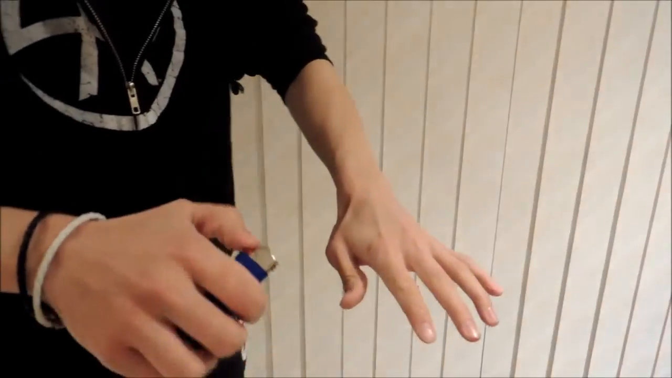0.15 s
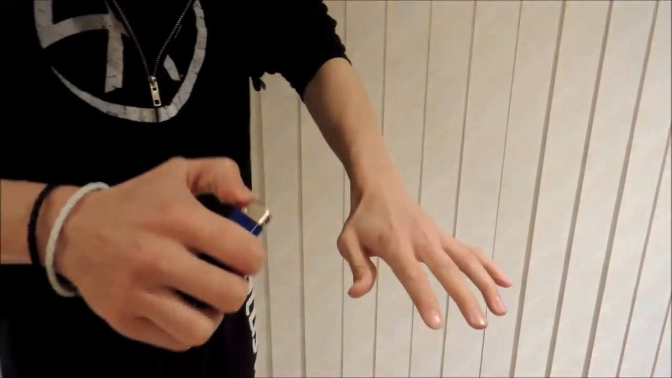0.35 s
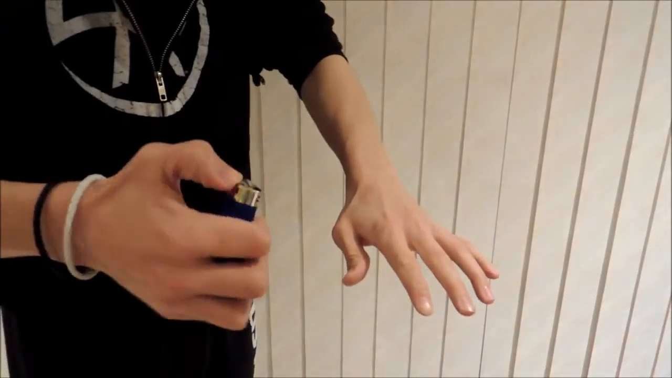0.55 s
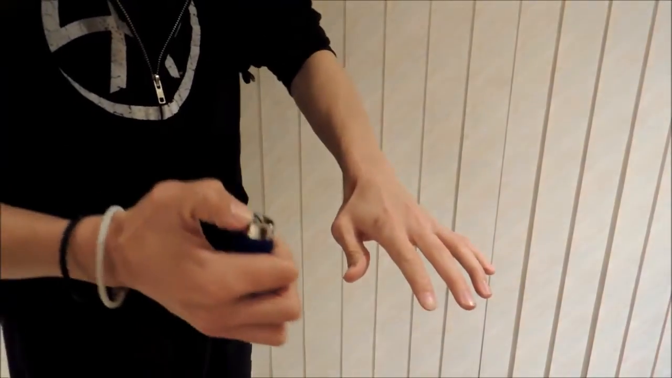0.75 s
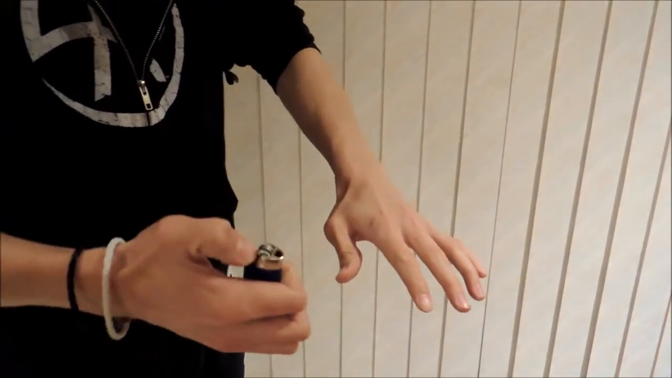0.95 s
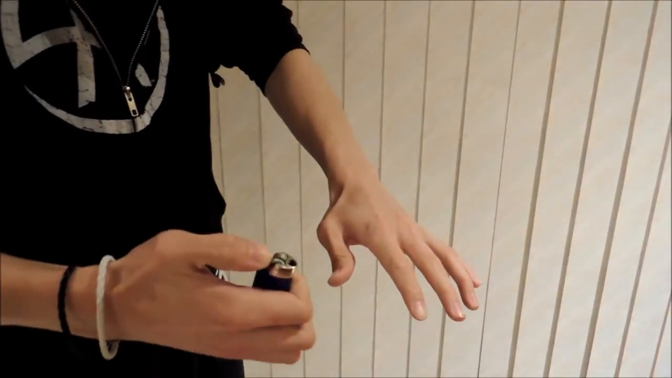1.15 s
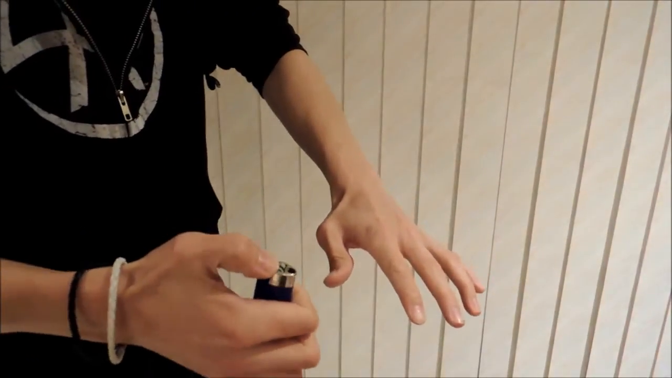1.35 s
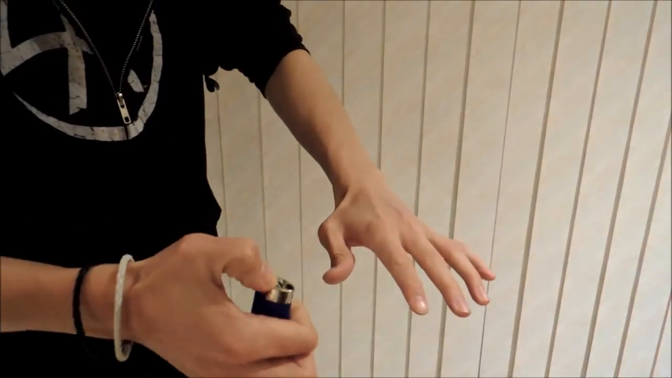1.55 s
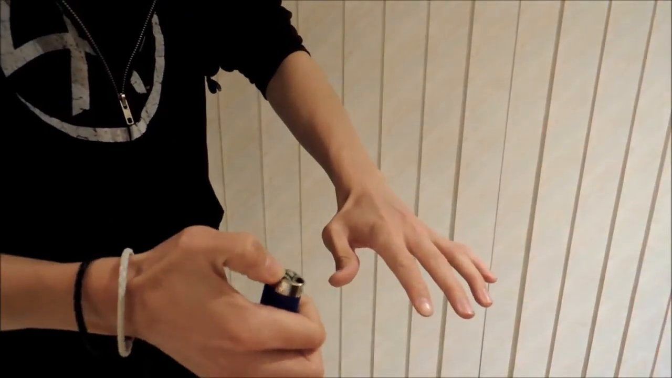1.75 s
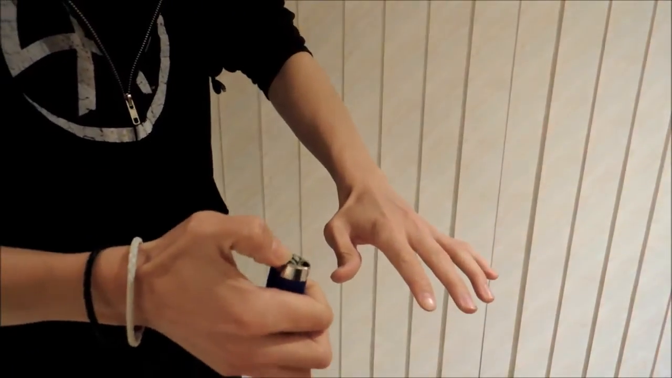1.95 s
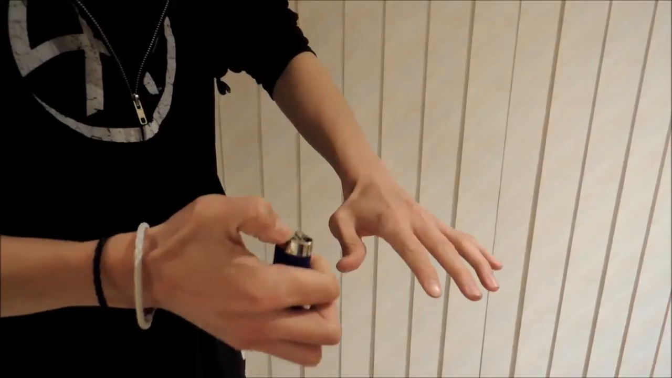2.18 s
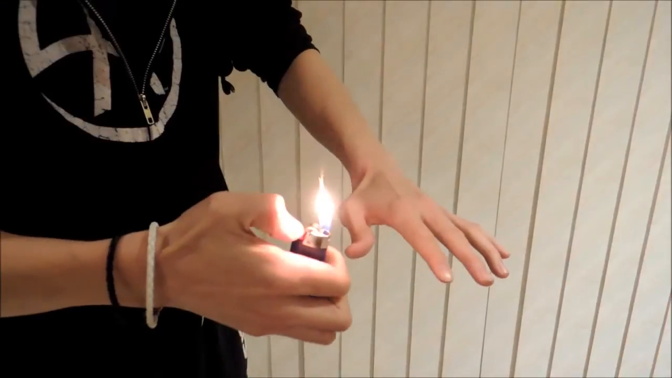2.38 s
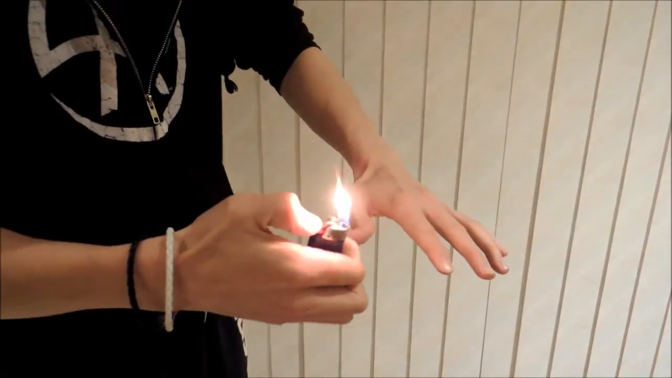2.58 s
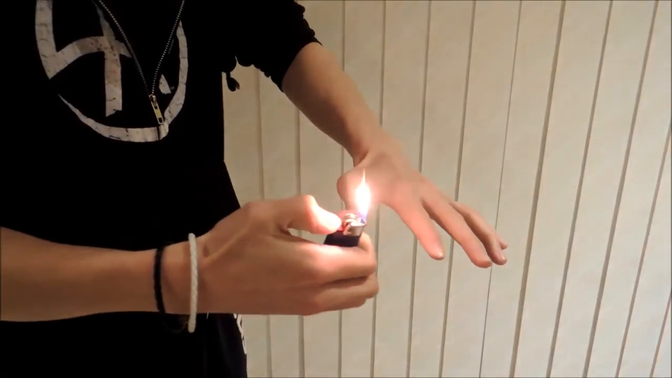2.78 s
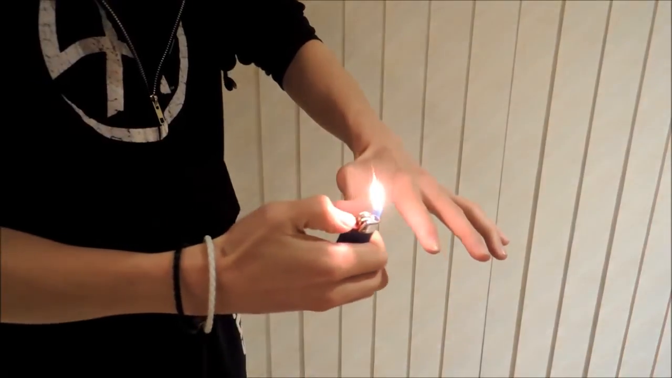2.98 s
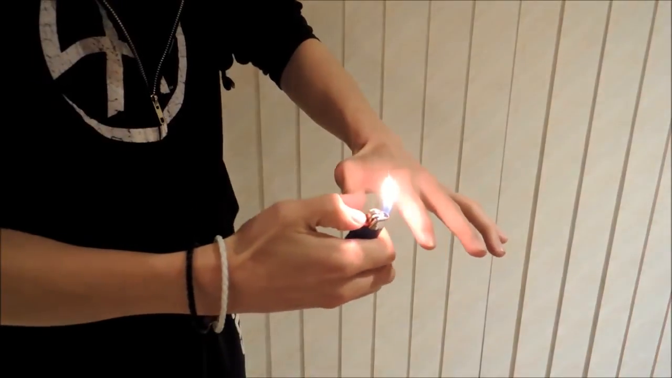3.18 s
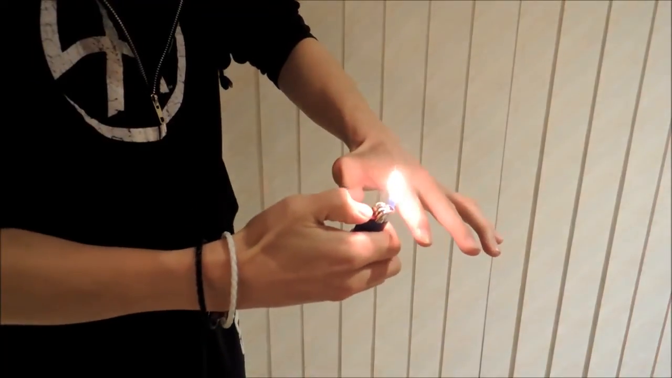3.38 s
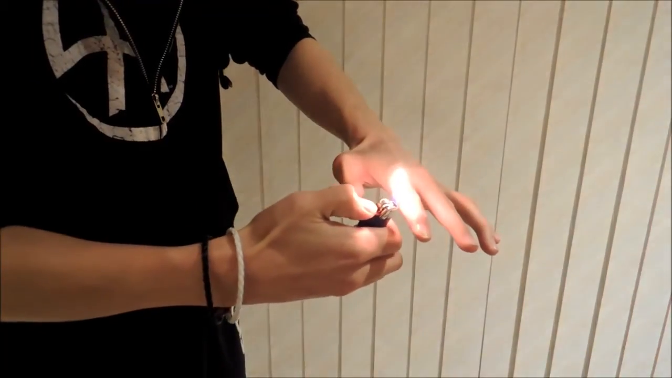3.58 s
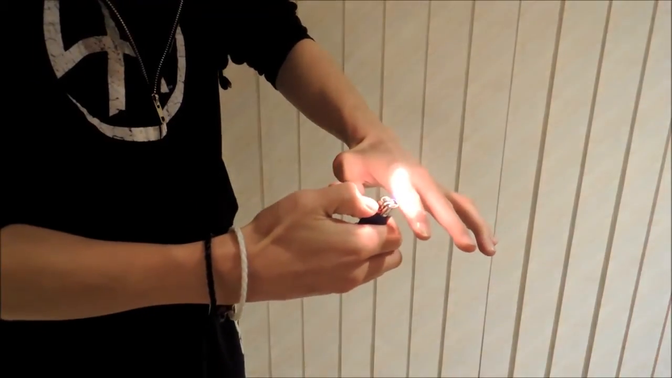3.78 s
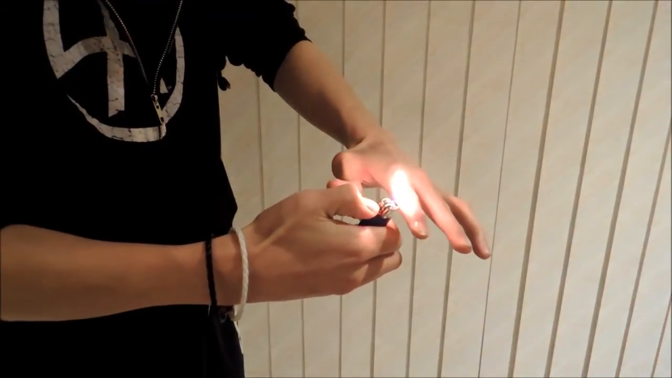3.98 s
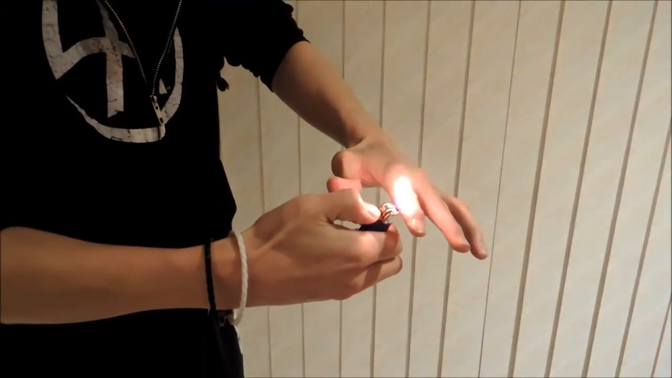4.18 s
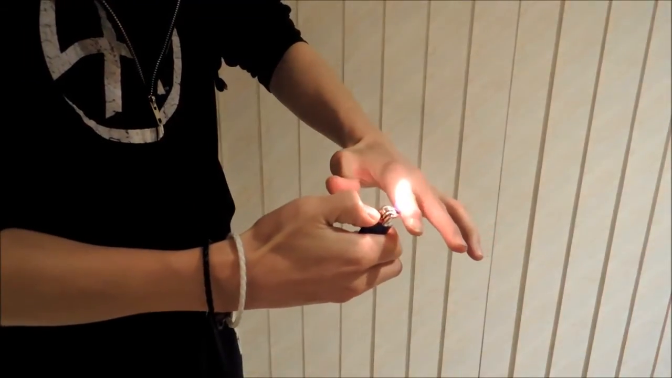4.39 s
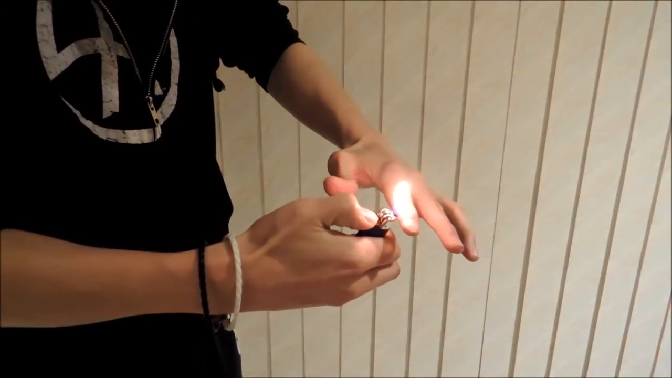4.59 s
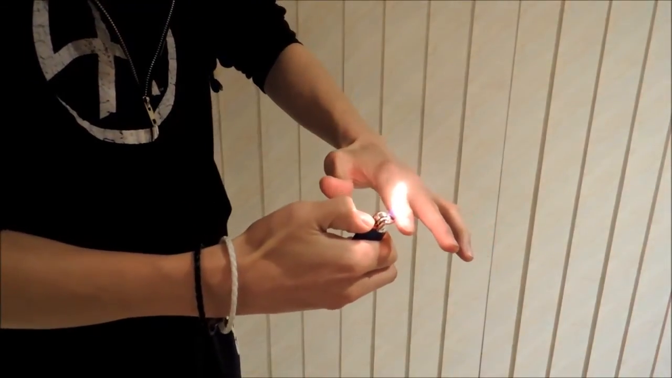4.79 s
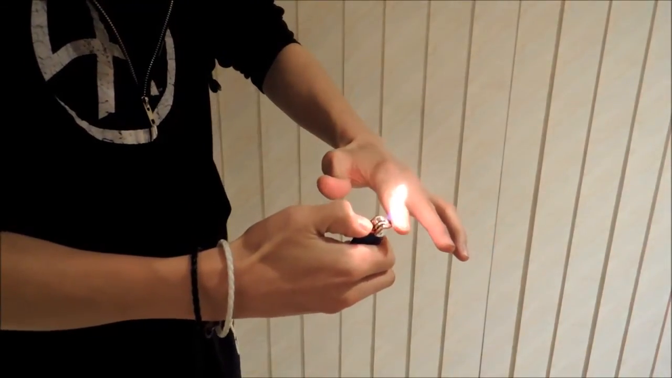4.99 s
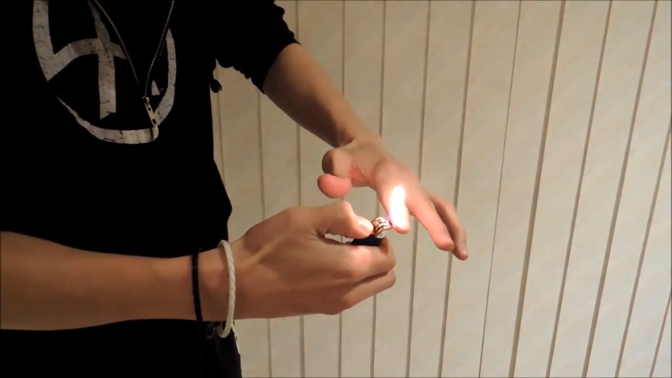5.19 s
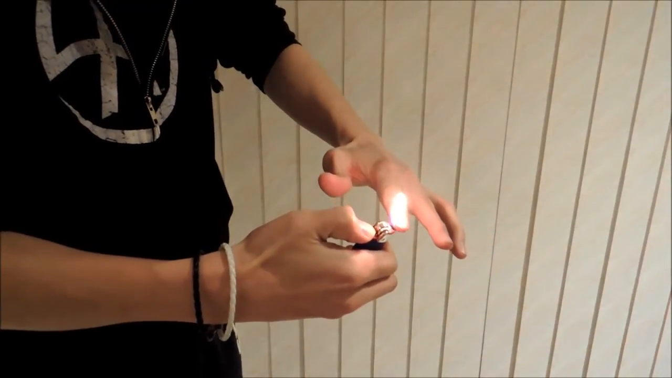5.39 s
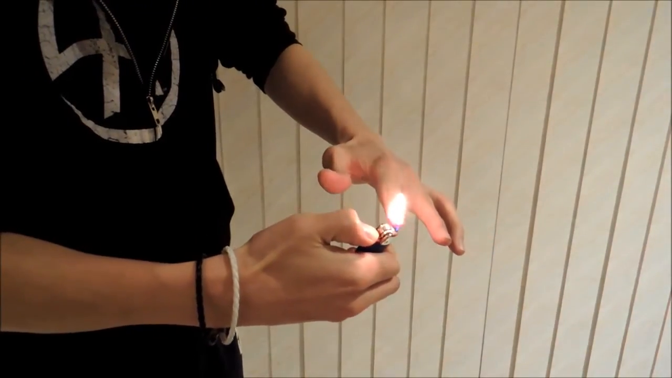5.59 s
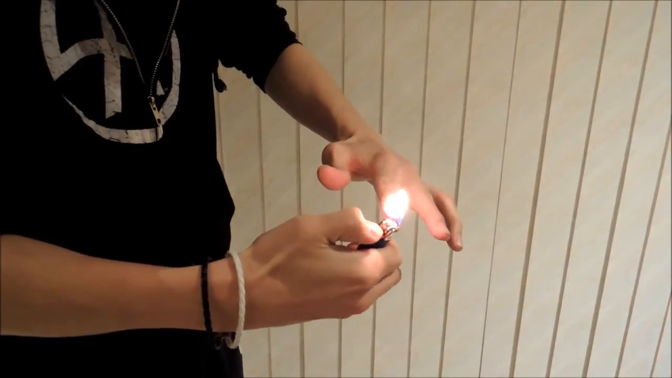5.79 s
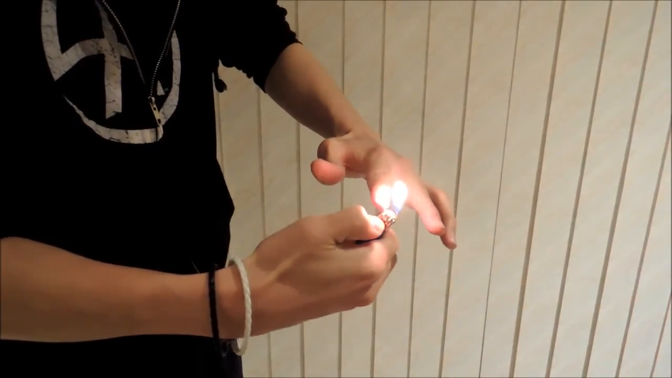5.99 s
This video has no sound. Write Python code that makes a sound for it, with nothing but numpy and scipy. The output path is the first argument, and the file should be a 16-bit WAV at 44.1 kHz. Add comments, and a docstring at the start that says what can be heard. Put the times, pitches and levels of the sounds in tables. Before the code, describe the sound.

A small panelled room, heard in stereo from close by: a low, steady, slightly wavering mains hum lies under soft air noise, with tiny irregular watery plinks farther away throughout. Hands rub faintly around 0.5 s, and the thumb makes small dry ticks at 0.7 and 0.8. At 0.97 s the lighter's toothed wheel gives a loud, very brief, bright rasp with snappy lever taps and a thin metallic ring that dies within half a second. A clear tick comes at 1.24, a softer one at 1.8, another faint one at 2.0. At 2.38 the second strike is harsher, with a high squeal, a dull plastic knock and another bright tap. Small ticks follow near 2.55. From 3 s on it is quiet: hum, scattered plinks, a more noticeable one near 3.4, slight thumb slides at 3.1, 4.5 and 5.4, and a short soft rub at 5.1, until about 6 s.

```python
"""A disposable lighter is struck twice close to the microphone in a small panelled room.
The toothed wheel rasps over the flint, squeals and sets the metal hood ringing; the lever taps and knocks.
The thumb ticks and scrapes on the case, and the hands rub softly: all are shaped bursts of noise.
A mains appliance hums as a row of harmonics over room air, which is coloured noise; gliding sine bubbles
make faint plinks, like water trickling in a radiator, from across the room."""
import sys
import numpy as np
from scipy import signal
from scipy.fft import rfft, irfft
from scipy.io import wavfile

SR = 44100
rng = np.random.default_rng(int(sys.argv[2]) if len(sys.argv) > 2 else 0)


def pcm_store(signal):
    """Save signal as 16-bit PCM."""
    levels = np.round(np.clip(np.atleast_2d(signal), -1, 1) * 32767)
    wavfile.write(sys.argv[1], SR, levels.astype(np.int16).T)


N = 266760
TIME = np.arange(N) / SR
OPPOSITE = np.array([[1], [-1]])  # left and right with opposite signs


def from_db(db):
    """Level law: decibels to amplitude gain."""
    return 10 ** (np.asarray(db) / 20)


def rms_one(x):
    """Normalisation: scale to an rms of 1."""
    return x / np.sqrt(np.mean(x ** 2) + 1e-20)


def at_hz(points, hz):
    """Interpolation of a table along a logarithmic frequency axis."""
    f, value = np.transpose(points)
    return np.interp(np.log(np.maximum(hz, 1)), np.log(f), value)


def bins(x):
    """Frequencies (Hz) of the Fourier bins of x."""
    return np.fft.rfftfreq(x.shape[-1], 1 / SR)


def colour(x, spectrum):
    """Linear filtering: weight each frequency by a smooth gain curve in dB."""
    gain = from_db(at_hz(spectrum, bins(x)))
    return irfft(rfft(x) * gain, x.shape[-1])


def drift(knots_per_s):
    """Random modulation: straight lines between normally distributed knots."""
    knots = rng.standard_normal(4096)
    return np.interp(TIME * knots_per_s, np.arange(len(knots)), knots)


def resonate(x, hz, width_hz):
    """Resonance: a damped two-pole mode with gain 1 at its peak."""
    radius = np.exp(-np.pi * width_hz / SR)
    zeros = np.array([1, 0, -1]) * (1 - radius ** 2) / 2
    poles = [1, -2 * radius * np.cos(2 * np.pi * hz / SR), radius ** 2]
    return signal.lfilter(zeros, poles, x + 1e-18)


def swell(peak_s, rise_s, fall_s):
    """Exponential growth up to a peak, exponential decay after it."""
    time_constants = np.maximum((peak_s - TIME) / rise_s, (TIME - peak_s) / fall_s)
    return np.exp(-np.minimum(time_constants, 50))


def under(envelope, x):
    """Energy matching: give a burst the rms of its envelope."""
    return rms_one(x) * np.sqrt(np.mean(envelope ** 2))


MAINS_HZ = 59.98
# mains harmonics: order (multiple of the mains rate), level_db (dB rms before the waver)
HARMONICS = [(1, -68.5), (2, -63.5), (3, -60), (4, -62), (5, -51), (6, -62), (7, -55.5), (8, -61.5),
             (9, -65), (10, -66.5), (12, -66), (13, -88), (14, -76.5), (15, -66.5), (16, -67.5)]


def hum(waver_db=1.3, scatter_rad=0.77):
    """Magnetic attraction pulls an iron core twice per mains cycle; odd orders are set a quarter turn off."""
    out = np.zeros((2, N))
    for order, level_db in HARMONICS:
        quarter_turn = np.pi / 2 * (order % 2)
        stereo_turn = .1 * rng.choice([-1, 1]) * OPPOSITE
        phase = quarter_turn + scatter_rad * rng.standard_normal() + stereo_turn
        amplitude = np.sqrt(2) * from_db(level_db + waver_db * drift(5.6))
        out += amplitude * np.sin(2 * np.pi * order * MAINS_HZ * TIME + phase)
    return out


# spectrum of the room air: frequency_hz, relative gain_db
AIR_SPECTRUM = [(12, -38.5), (20, 1), (81, -8.5), (179, -9.5), (249, -12.5), (302, -10.5), (346, -15),
                (419, -9.5), (650, -12.5), (706, -18), (787, -13.5), (954, -10.5), (1160, -19),
                (12900, -26.5), (14000, -26)]
# left-right likeness of the room air: frequency_hz, correlation (0-1)
AIR_LIKENESS = [(30, 1), (100, 0.5), (400, 0.67), (1000, 0.53), (3000, 0.03), (12000, 0)]
AIR_DB = -50  # rms


def air():
    """Partial coherence: low rumble and smooth hiss, more alike on the two sides in the bass."""
    mid, side = rfft(rng.standard_normal((2, N)))
    alike = np.clip(at_hz(AIR_LIKENESS, bins(TIME)), 0, 1)
    pair = irfft(np.sqrt(1 + alike) * mid + np.sqrt(1 - alike) * side * OPPOSITE, N)
    return from_db(AIR_DB) * rms_one(colour(pair, AIR_SPECTRUM))


# spectrum of cloth and skin friction: frequency_hz, relative gain_db
RUB_SPECTRUM = [(500, -24.5), (1200, -1.5), (1700, 3.5), (2600, -2), (4200, -8.5), (6500, -18.5),
                (14000, -25.5)]
# hand movements: fastest_s, level_db, half_length_s
HAND_MOVES = [(0.537, -63.5, 0.18), (1.152, -67.5, 0.36), (2.948, -60, 0.11), (4.5, -64.5, 0.09),
              (5.113, -58, 0.029)]
RESTING_RUB_DB = -69  # friction while the hands hover


def rubbing(grain_db=3.5):
    """Friction noise: sleeve and skin rub unevenly, swelling and fading with each movement."""
    level = from_db(RESTING_RUB_DB)
    for fastest_s, level_db, half_s in HAND_MOVES:
        level = level + from_db(level_db) * np.exp(-((TIME - fastest_s) / half_s) ** 2)
    grains = rng.standard_normal(N) * from_db(grain_db * drift(70))
    return level * rms_one(colour(grains, RUB_SPECTRUM))


TRICKLE_LOW_HZ, TRICKLE_HIGH_HZ = 1348, 4600
TRICKLE_DB = -57.5  # middle level of the largest bubbles
TRICKLE_LOSS_DB, TRICKLE_SCATTER_DB = 3.0, 4.5  # loss towards the smallest; full range of chance


def trickle(count=80):
    """Bubble size sets pitch: a steady, uneven run, the higher ones weaker; rows of (s, Hz, dB)."""
    bubbles = []
    for k, (when, small, luck) in enumerate(rng.random((count, 3))):
        start_s = (k + when) / count * N / SR
        pitch_hz = TRICKLE_LOW_HZ * (TRICKLE_HIGH_HZ / TRICKLE_LOW_HZ) ** small
        level_db = TRICKLE_DB - TRICKLE_LOSS_DB * small + TRICKLE_SCATTER_DB * (luck - .5)
        bubbles.append((start_s, pitch_hz, level_db))
    return bubbles


# the clearest water plinks: start_s, pitch_hz (before the glide), level_db (before the room mix)
CLEAR_PLINKS = [(0.183, 3790, -47), (0.936, 1110, -41.5), (1.186, 2404, -48), (1.370, 4380, -51.5),
                (1.795, 2540, -51), (2.779, 1110, -47.5), (2.908, 2080, -51), (2.998, 1400, -45),
                (3.277, 2640, -51.5), (3.366, 1372, -40.5), (4.115, 1900, -51.5), (4.306, 1614, -46.5),
                (4.459, 1830, -51.5), (4.836, 1910, -52.5), (5.114, 2360, -49), (5.125, 2970, -49),
                (5.169, 2660, -46), (5.584, 2585, -50.5), (5.901, 2255, -52.5)]


def plinks(glide=.012, ring_s=.011):
    """Bubble resonance: each rings briefly and rises a little in pitch, the small ones more splashy."""
    out, wobble = np.zeros(N), drift(520)
    for start_s, pitch_hz, level_db in CLEAR_PLINKS + trickle():
        near = slice(max(int((start_s - .04) * SR), 0), int((start_s + .12) * SR))
        t = TIME[near] - start_s
        onset = 1 / (1 + np.exp(-(t + .010) / .0012))
        shape = onset * np.exp(-np.maximum(t, 0) / ring_s)
        phase = 2 * np.pi * pitch_hz * (t + glide * t * t / ring_s / 2)
        splash = np.clip((pitch_hz - 900) / 1200, .4, 1.8)
        out[near] += from_db(level_db) * shape * np.sin(phase + splash * wobble[near])
    return out


# spectrum of a nail tick: frequency_hz, relative gain_db
TICK_SPECTRUM = [(300, -26.5), (2000, 2.5), (4000, 0.5), (7000, -3), (10000, -8), (14000, -3.5)]
# thumb and nail ticks on the case: peak_s, level_db
CASE_TICKS = [(0.6962, -43.5), (0.7825, -46), (1.237, -29.5), (1.8, -38.5), (2.0194, -45.5), (2.5357, -43),
              (2.553, -44), (3.5878, -45), (5.1059, -49), (5.986, -47)]
# the thumb slides a little on the held lever: peak_s, level_db
LEVER_SLIDES = [(3.1254, -52.5), (4.52, -54), (5.410, -51)]
TICK_RISE_S, TICK_DECAY_S, TICK_HZ, TICK_WIDTH_HZ = .00066, .0027, 12000, 4800
# the thumb takes up the wheel with a small scrape just before each strike
GRIP_LEAD_S, GRIP_DB, GRIP_RISE_S, GRIP_DECAY_S, GRIP_HZ = .006, -30.5, .0029, .0037, 7020
SLIDE_RISE_S, SLIDE_DECAY_S = .0031, .022


def ticks():
    """Contact noise: tiny dry ticks on the case, and duller scrapes of the thumb on wheel and lever."""
    grit = colour(rng.standard_normal(N), TICK_SPECTRUM)
    touch = sum(from_db(db) * swell(s, TICK_RISE_S, TICK_DECAY_S) for s, db in CASE_TICKS)
    grip = sum(swell(s - GRIP_LEAD_S, GRIP_RISE_S, GRIP_DECAY_S) for s, *_ in WHEEL_STRIKES)
    slide = sum(from_db(db) * swell(s, SLIDE_RISE_S, SLIDE_DECAY_S) for s, db in LEVER_SLIDES)
    scrape = from_db(GRIP_DB) * grip + slide
    bright = under(touch, resonate(touch * grit, TICK_HZ, TICK_WIDTH_HZ))
    dull = under(scrape, resonate(scrape * grit, GRIP_HZ, TICK_WIDTH_HZ))
    return bright + dull


# wheel and spring resonances: pitch_hz, width_hz, relative level_db
BODY_MODES = [(2930, 100, -0.5), (3290, 250, -6.5), (4060, 90, -4), (5300, 470, -1), (6403, 500, 2.5),
              (7136, 400, -1.5), (8400, 340, 2), (9600, 400, -2), (11330, 500, -1.5), (12100, 500, -2.5),
              (12880, 300, 2), (13500, 400, 3)]
# contact noise that radiates directly: frequency_hz, relative gain_db
RASP_SPECTRUM = [(150, -33.5), (600, -18), (1500, -14.5), (2500, -30), (3000, -4), (4500, -3.5),
                 (7000, -3.5), (9800, -3), (12000, 6), (14500, -12)]


def lighter_body(force, direct_db=5.0):
    """Modal radiation: contact noise sounds directly and through resonances of the metal parts."""
    rings = sum(from_db(db) * resonate(force, hz, width_hz) for hz, width_hz, db in BODY_MODES)
    return from_db(direct_db) * colour(force, RASP_SPECTRUM) + rings


# wheel strikes: fastest_s, rasp_db, spin_up_s, run_down_s, treble_lift_db, squeal_db
WHEEL_STRIKES = [(0.9665, -7.5, .0019, .0024, 2.5, -21), (2.3807, -6, .0026, .0035, 1, -5)]


def wheel(teeth_per_s=500, bite_db=7.5):
    """Amplitude modulation: teeth grind the flint in bites that swell and fade with the spin."""
    out = np.zeros(N)
    for fastest_s, rasp_db, rise_s, fall_s, lift_db, _ in WHEEL_STRIKES:
        speed = from_db(rasp_db) * swell(fastest_s, rise_s, fall_s)
        bite_phase = 2 * np.pi * teeth_per_s * (TIME - fastest_s) + .6 * drift(360)
        bites = from_db(bite_db * np.cos(bite_phase))
        impulses = speed * bites * rng.choice([-1., 1.], N)
        grit = colour(impulses, [(7000, 0), (12000, lift_db)])
        out += under(speed, lighter_body(grit))
    return out


# modes in which the wheel squeals: pitch_hz, relative level_db
SQUEAL_MODES = [(7145, -9), (8222, 0), (8580, -4)]


def squeal(early_s=.001073, jitter_rad=1.0, length_s=.0026):
    """Stick-slip: just before top speed the wheel sounds its own modes, which beat together."""
    out = np.zeros(N)
    for fastest_s, *_, squeal_db in WHEEL_STRIKES:
        t = TIME - fastest_s + early_s
        modes = 0
        for hz, db in SQUEAL_MODES:
            phase = 2 * np.pi * hz * (t - early_s / 2) + jitter_rad * drift(1400)
            modes = modes + from_db(db) * np.sin(phase)
        grip = from_db(squeal_db) * np.exp(-np.minimum((t / length_s) ** 2, 50))
        out += under(grip, grip * modes)
    return out


# long-ringing modes of the hood: pitch_hz, level_db, t60_s
HOOD_MODES = [(1356, -42, .47), (4040, -47, .28), (7143, -48, .25)]


def hood():
    """Free vibration: the thin steel hood rings on after each strike, each mode decaying exponentially."""
    out = np.zeros(N)
    for fastest_s, *_ in WHEEL_STRIKES:
        for hz, db, t60_s in HOOD_MODES:
            envelope = from_db(db) * swell(fastest_s, .001, t60_s / np.log(1000))
            out += envelope * np.sin(2 * np.pi * hz * (TIME - fastest_s))
    return out


# the thumb slips off the wheel and lands on the gas lever: peak_s, tap_db, thud_db
LEVER_CONTACTS = [(0.9684, -22.5, -42), (0.9723, -18, -48), (2.3796, -24, -18), (2.3860, -17.5, -50.5)]
# dull knock of the tank: frequency_hz, relative gain_db
THUD_SPECTRUM = [(80, -9.5), (300, -6), (750, 0.5), (1300, -2.5), (2300, -4), (3500, -19), (9000, -38)]


def lever(tap_hz=6000, tap_width_hz=3500):
    """Impact: the lever stops with a bright tap and a dull knock of the plastic tank."""
    tap = sum(from_db(db) * swell(s, .0005, .0013) for s, db, _ in LEVER_CONTACTS)
    thud = sum(from_db(db) * swell(s, .0004, .0010) for s, _, db in LEVER_CONTACTS)
    white = rng.choice([-1., 1.], (2, N))
    bright = lighter_body(resonate(tap * white[0], tap_hz, tap_width_hz))
    dull = colour(thud * white[1], THUD_SPECTRUM)
    return under(tap, bright) + under(thud, dull)


# room decay: frequency_hz, t60_s
ROOM_DECAY = [(300, 0.21), (1400, 0.267), (3500, 0.29), (7000, 0.19), (13000, 0.13)]


def room(x, first_s, side_db, early_db=2.5, early_s=.02):
    """Reverberation: dense reflections from panelled walls, boosted early; each band has its own decay."""
    t = TIME[:SR // 2]
    mid, side = rfft(rng.standard_normal((2, len(t))))
    white = mid + from_db(side_db) * side * OPPOSITE
    centres, tail = np.geomspace(200, 14000, 12), 0
    for hz in centres:
        # overlapping bands that sum to one
        share = at_hz([(c, float(c == hz)) for c in centres], bins(t))
        decay = np.exp(-np.log(1000) * t / at_hz(ROOM_DECAY, hz))
        tail = tail + irfft(white * share, len(t)) * decay
    tail = tail * (t > first_s) * from_db(early_db * np.exp(-t / early_s))
    tail = tail / np.sqrt(np.sum(tail ** 2) / 2)
    return signal.fftconvolve(x[None], tail, axes=1)[:, :N]


def place(x, spread_rad):
    """Interchannel phase: a near source differs between the two ports, more so towards the treble."""
    turn = spread_rad * np.sqrt(bins(x) / 8000) * OPPOSITE
    return irfft(rfft(x) * np.exp(1j * turn), N)


# the left port is a little more sensitive: frequency_hz, left_minus_right_db
PORT_DIFFERENCE = [(100, .3), (2000, .3), (8000, .8), (13000, 2.2)]


def scene():
    """Direct-to-reverberant ratio: the lighter is near and fairly dry, the plinks farther and wetter."""
    lighter, shriek, soft = wheel() + lever() + ticks(), squeal(), plinks() + rubbing()
    direct = place(lighter + shriek + hood(), spread_rad=.2603)
    # the squeal is beamed at the microphone, so less of it reaches the walls
    to_walls = lighter + from_db(-3.5) * shriek
    walls = from_db(-8.5) * room(to_walls, first_s=.004, side_db=-6.0)
    far = from_db(1.5) * soft + from_db(-2.5) * room(soft, first_s=.0078, side_db=-7.5)
    mix = direct + walls + far + hum() + air()
    balance = from_db(at_hz(PORT_DIFFERENCE, bins(TIME)) * OPPOSITE / 2)
    return irfft(rfft(mix) * balance, N)


CUTOFF_HZ = 14150


def record(dry, limit_db=0.5, release_db_per_s=5.5):
    """Compression: gain ducks on the loudest peak and recovers slowly; peaks clip and the top is cut."""
    peak_db = 20 * np.log10(np.abs(dry).max(axis=0) + 1e-9)
    over = np.maximum(peak_db - limit_db, 0)
    release = release_db_per_s * TIME
    held = np.maximum.accumulate(over + release) - release
    attack = np.exp(-1 / (0.035 * SR))  # 35 ms time constant
    smooth = signal.lfilter([1 - attack], [1, -attack], held)
    clipped = np.clip(dry * from_db(-.7 * smooth), -1, 1)
    low_pass = signal.ellip(10, .2, 80, CUTOFF_HZ, fs=SR, output="sos")
    return signal.sosfilt(low_pass, clipped)


dry = scene()
out = record(dry)
pcm_store(out)
```